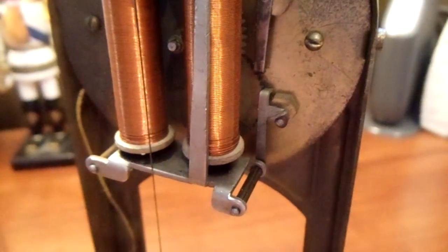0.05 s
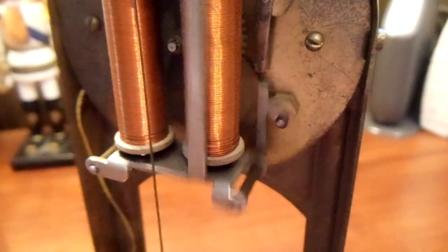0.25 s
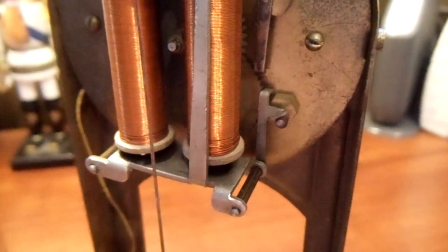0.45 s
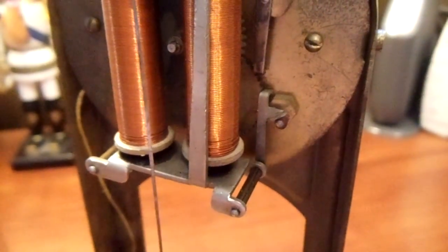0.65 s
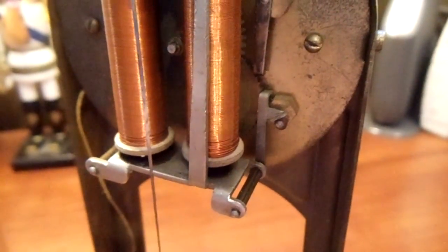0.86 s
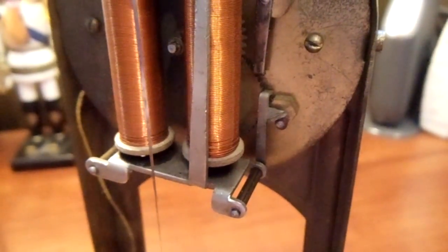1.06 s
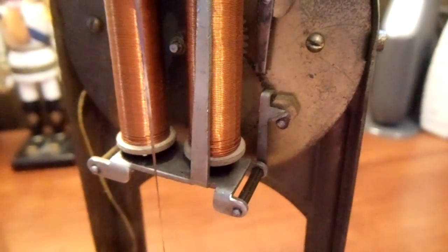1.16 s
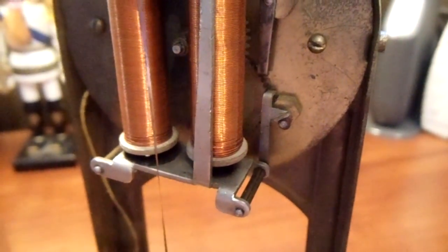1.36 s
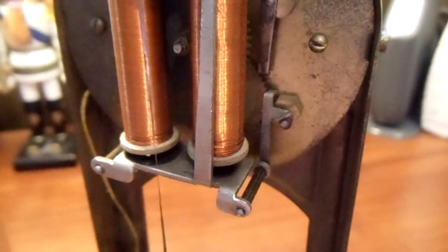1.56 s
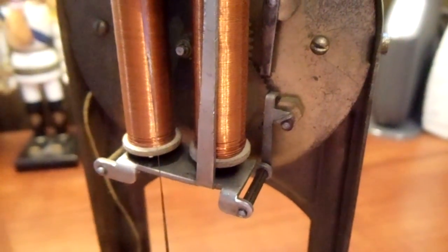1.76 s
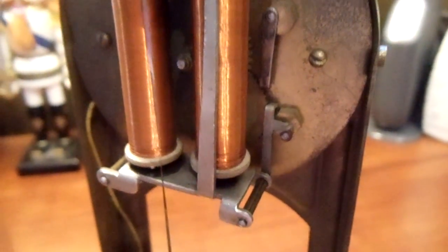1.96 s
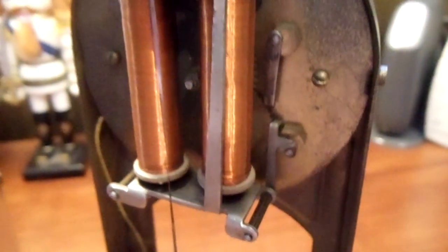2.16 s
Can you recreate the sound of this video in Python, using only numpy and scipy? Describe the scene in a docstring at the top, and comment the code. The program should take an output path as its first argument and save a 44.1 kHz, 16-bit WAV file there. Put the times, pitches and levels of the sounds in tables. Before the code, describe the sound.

A single sharp metallic click from an old clock mechanism over quiet room hiss.

```python
"""A quiet room: close by, the armature of an old electromagnetic clock trips once.
A quick run of metal contacts (take-up, slip, latch, hard stop, rebounds) rings the levers and the
frame, and the closing armature shakes the table. Behind it lie room rumble, hiss, a wavering
mains hum, a thin electrical whine and, late on, a faint whistle."""
import sys
import numpy as np
from scipy import signal
from scipy.fft import rfft, irfft
from scipy.io import wavfile
from scipy.ndimage import uniform_filter1d

SR = 44100
rng = np.random.default_rng(int(sys.argv[2]) if len(sys.argv) > 2 else 0)


def store_wav(level_fs):
    """Save 16-bit WAV to argv[1]."""
    pcm = np.round(np.clip(np.atleast_2d(level_fs), -1, 1) * 32767)
    wavfile.write(sys.argv[1], SR, pcm.T.astype(np.int16))


N = 97020
TIME = np.arange(N) / SR
CUTOFF_HZ = 14100

# Armature and pawl contacts. Each row: start in seconds, relative level in dB,
# brightness in dB per octave, crack offset in dB, lever ring offset in dB.
CONTACTS = [(0.2187, -32, -3.5, -4, -4), (0.2327, -11, 0.14, 3.5, -4.5), (0.2533, -11, 5.5, 2.5, -4),
            (0.2582, -4, -2, 4, 0), (0.2690, -16, -5, -5, 5), (0.2807, 1.5, 0.77, 3, 0),
            (0.3008, -18, -1, 1, -6), (0.3070, -16, -2.5, 0.5, -4)]


def from_db(db):
    """Decibels to gain."""
    return 10 ** (np.asarray(db) / 20)


def unit_rms(x):
    """Scale to rms 1."""
    return x / np.sqrt(np.mean(x ** 2) + 1e-20)


def at_hz(points, hz):
    """Read a table on a log-frequency axis."""
    table_hz, values = np.transpose(points)
    return np.interp(np.log(hz), np.log(table_hz), values)


def envelope(points):
    """Gain over time from rows of seconds and dB."""
    return from_db(np.interp(TIME, *np.transpose(points)))


def tilt(hz, db_per_octave):
    """Each contact has its own brightness: a slope about 5 kHz, flat below 1 kHz."""
    return from_db(db_per_octave * np.log2(np.maximum(hz, 1000) / 5000))


def room():
    """Rumble and hiss, swelling slightly."""
    # Each row: frequency in Hz, relative noise density in dB.
    spectrum = [(15, 2.5), (30, -0.5), (60, -2.5), (95, -11.5), (170, -13), (300, -17.5), (600, -23.5),
                (1200, -29), (2500, -34.5), (5000, -39.5), (9000, -43.5), (14000, -47.5)]
    # Each row: time in seconds, gain in dB.
    swell = [(0, 0.5), (1.4, 0), (1.8, 0.1), (2.2, 1)]
    hz = np.maximum(np.arange(N // 2 + 1) * SR / N, 1)
    shape = from_db(at_hz(spectrum, hz)) * (hz > 10)
    air = unit_rms(irfft(rfft(rng.standard_normal(N)) * shape, N))
    return from_db(-44) * envelope(swell) * air


def mains_hum(hz=119.4):
    """One low mains tone of wavering level."""
    # Each row: time in seconds, rms level in dB.
    levels = [(0, -59), (.45, -56.5), (.6, -51.5), (1.1, -53.5), (1.35, -62.5), (1.7, -49), (2.2, -50.5)]
    return envelope(levels) * np.sqrt(2) * np.sin(2 * np.pi * hz * TIME)


def whistle(hz=2500, width_hz=160, rms_db=-67, start_s=1.94, fade_s=0.04):
    """A faint, narrow band of noise fades in late."""
    band = signal.butter(2, [hz - width_hz / 2, hz + width_hz / 2], "band", fs=SR, output="sos")
    fade_in = np.clip((TIME - start_s) / fade_s, 0, 1)
    return from_db(rms_db) * fade_in * unit_rms(signal.sosfilt(band, rng.standard_normal(N)))


def whine(hz=7864, wobble_rms_hz=35.8, rms_db=-68.5):
    """A thin electrical tone of even level and unsteady pitch."""
    wobble = unit_rms(uniform_filter1d(rng.standard_normal(N), size=300))
    phase = 2 * np.pi * np.cumsum(hz + wobble_rms_hz * wobble) / SR
    return from_db(rms_db) * np.sqrt(2) * np.sin(phase)


def table_thud(start_s=0.275, hz=64.9, peak_db=-35.5, rise_s=0.016):
    """The closing armature shakes the table: a soft, low swell."""
    t = np.maximum(TIME - start_s, 0)
    swell = t / rise_s * np.exp(1 - t / rise_s)
    return from_db(peak_db) * swell * np.sin(2 * np.pi * hz * t)


def dense_modes(spectrum, brightness, decay, count=900):
    """Crowded modes of random phase, rms 1 before tilt, decaying in 20 bands."""
    low_hz, high_hz = 250, CUTOFF_HZ + 300
    hz = low_hz + (np.arange(count) + rng.random(count)) * (high_hz - low_hz) / count
    phase = rng.uniform(0, 2 * np.pi, count)
    gain = from_db(at_hz(spectrum, hz))
    gain = gain / np.sqrt(np.sum(gain ** 2) / 2) * tilt(hz, brightness)
    length = SR // 2
    t, out = TIME[:length], np.zeros(length)
    for band in np.array_split(np.arange(count), 20):
        bins = np.zeros(length // 2 + 1, complex)
        bins[(hz[band] * length / SR).astype(int)] = gain[band] * np.exp(1j * phase[band])
        t60_s = at_hz(decay, hz[band].mean())
        out += irfft(bins, length) * length / 2 * from_db(-60 * t / t60_s)
    return out


def frame(wash_attack_s=0.0017, crack_attack_s=0.00086, crack_hold_s=0.0012, crack_t60_s=0.0098):
    """Each contact gives a sharp crack and a short metallic wash from the frame."""
    # Frame modes and contact crack. Each row: frequency in Hz, relative density in dB.
    wash_spectrum = [(300, -32), (490, -20), (610, -3.5), (950, -4), (1250, -10.5), (1700, -5), (1980, -16),
                     (2200, 8), (3200, 3), (4000, -0.5), (5000, 1.5), (6400, -5.5), (7700, 2), (9500, -3),
                     (12000, -3), (13500, -1)]
    crack_spectrum = [(300, -36), (700, -11), (1900, -13), (2400, 3), (4000, 1), (5000, 5), (6400, -1.5),
                      (7700, 7), (10000, -1), (13500, -2.5)]
    # Frame damping. Each row: frequency in Hz, T60 in seconds.
    decay = [(600, 0.192), (2000, 0.13), (4000, 0.107), (8000, 0.074), (14000, 0.064)]
    out, t = np.zeros(N), TIME[:SR // 2]
    wash_gain = from_db(-17.5) * np.minimum(t / wash_attack_s, 1)
    crack_fall = from_db(-60 * np.maximum(t - crack_hold_s, 0) / crack_t60_s)
    crack_gain = from_db(-11.5) * np.minimum(t / crack_attack_s, 1) * crack_fall
    for start_s, contact_db, brightness, crack_db, _ in CONTACTS:
        wash = wash_gain * dense_modes(wash_spectrum, brightness, decay)
        crack = from_db(crack_db) * crack_gain * dense_modes(crack_spectrum, brightness, decay)
        start = int(start_s * SR)
        out[start:start + len(t)] += from_db(contact_db) * (wash + crack)
    return out


def levers():
    """Every contact rings the same clear steel modes of the levers and plate."""
    # One entry per mode: frequency in Hz, relative level in dB, T60 in seconds.
    modes_hz = [690, 1034, 1510, 1774, 2160, 2337, 2657, 2751, 3021, 3282, 4593, 4877, 5576, 7810, 10150,
                13100]
    modes_db = [-46, -42.5, -42.5, -40.5, -35, -25, -22.5, -35, -34.5, -23, -27.5, -24.5, -28.5, -22.5,
                -26.5, -27.5]
    modes_t60_s = [0.2004, .3, 0.202, .19, .1, 0.059, 0.18, .11, .1, 0.11, 0.0803, 0.082, .08, .055, .06,
                   0.055]
    start_s, contact_db, brightness, _, ring_db = np.transpose(CONTACTS)
    starts = (start_s * SR).astype(int)
    out = np.zeros(N)
    for hz, mode_db, t60_s in zip(modes_hz, modes_db, modes_t60_s):
        impulses = np.full(N, 1e-18)  # avoids denormals
        impulses[starts] = from_db(contact_db + ring_db + mode_db) * tilt(hz, brightness)
        radius, angle = from_db(-60 / (t60_s * SR)), 2 * np.pi * hz / SR
        out += signal.lfilter([0, np.sin(angle)], [1, -2 * radius * np.cos(angle), radius ** 2], impulses)
    return out


def scene():
    """The clock's click and thud over the quiet room, in mono."""
    radiation_hz = 480.7  # small parts radiate little below this
    highpass = signal.butter(4, radiation_hz, "high", fs=SR, output="sos")
    click = signal.sosfilt(highpass, frame() + levers())
    return (room() + mains_hum() + whistle() + whine() + table_thud() + click)[None]


def record(dry):
    """A steep low-pass cuts the top treble."""
    return signal.sosfilt(signal.ellip(10, .2, 70, CUTOFF_HZ, fs=SR, output="sos"), dry)


dry = scene()
out = record(dry)
store_wav(out)
```